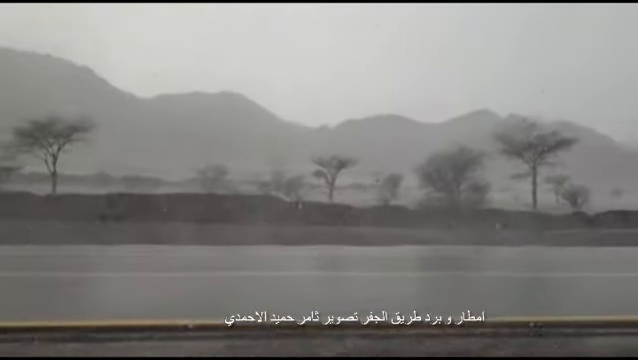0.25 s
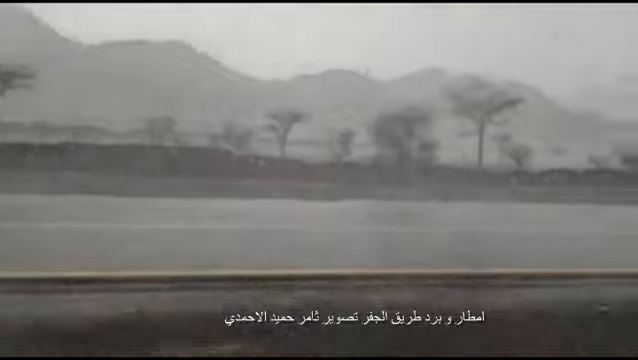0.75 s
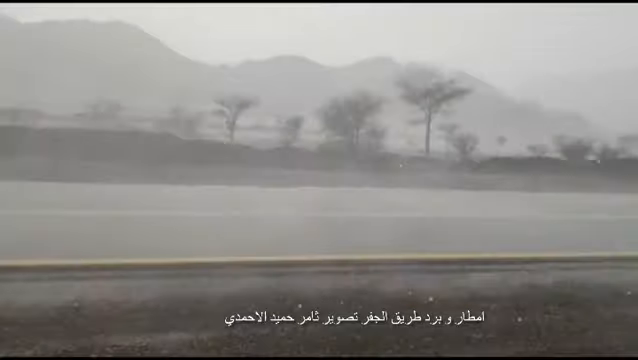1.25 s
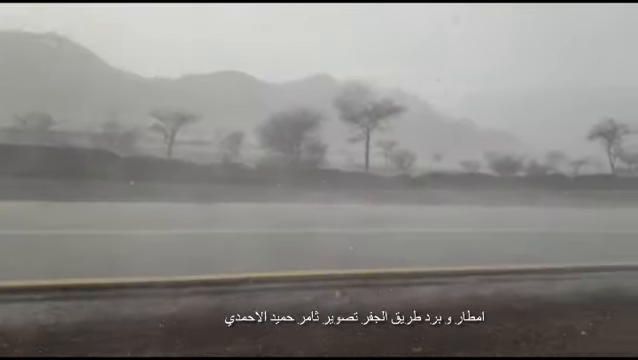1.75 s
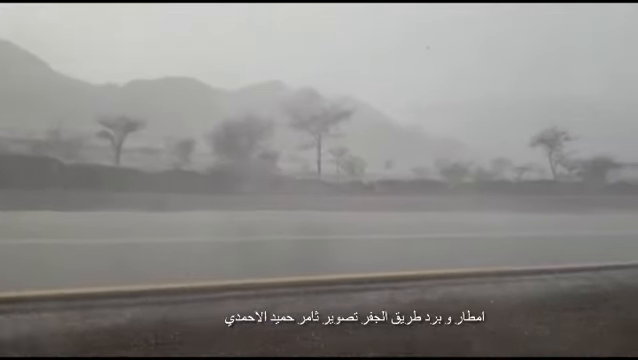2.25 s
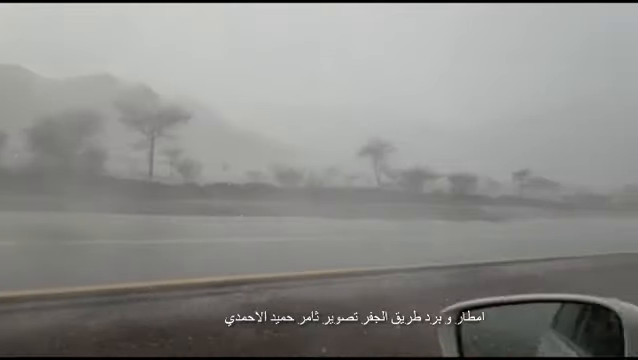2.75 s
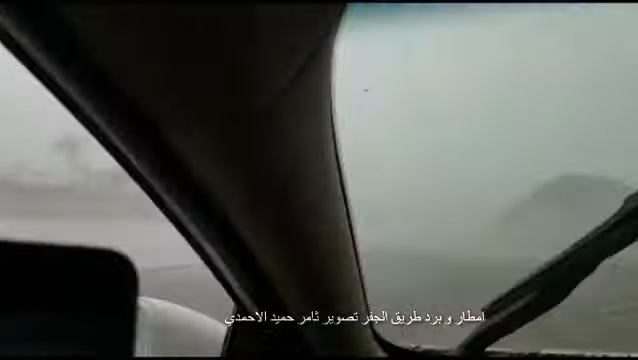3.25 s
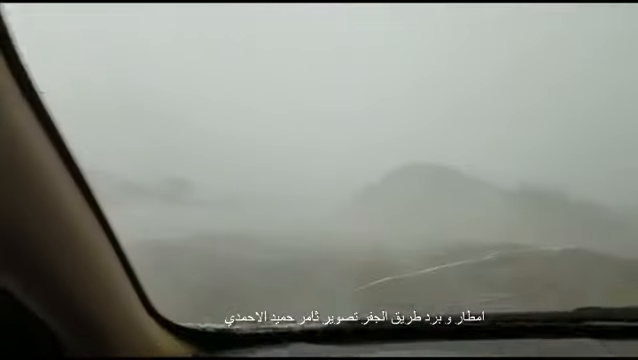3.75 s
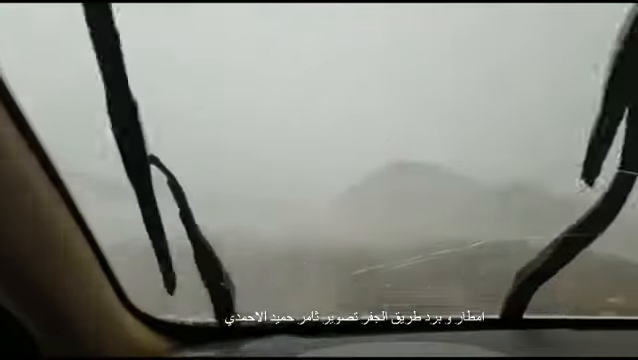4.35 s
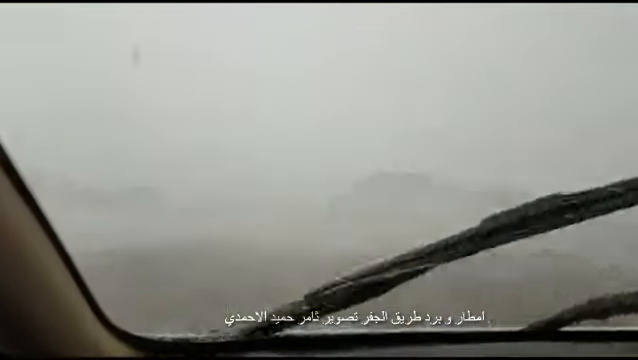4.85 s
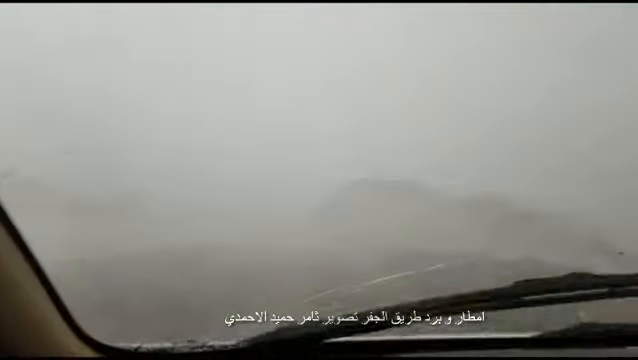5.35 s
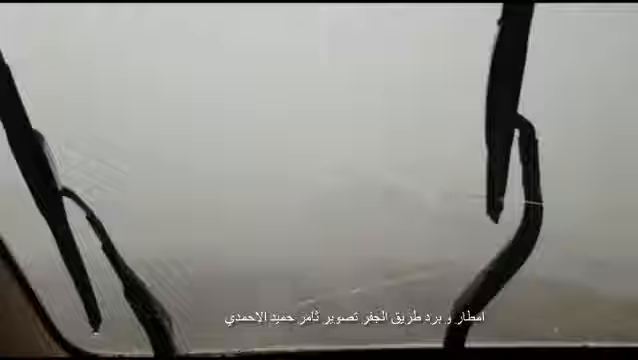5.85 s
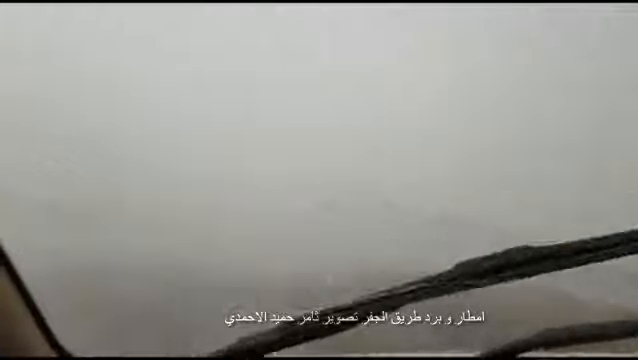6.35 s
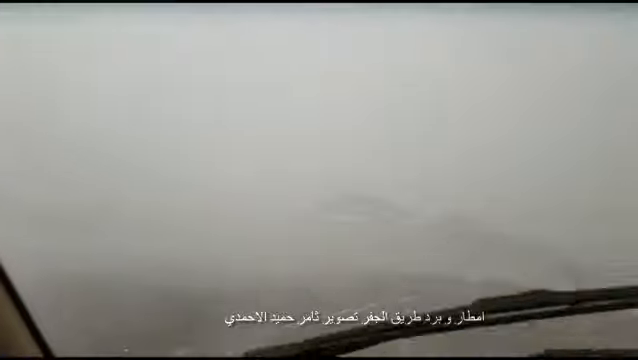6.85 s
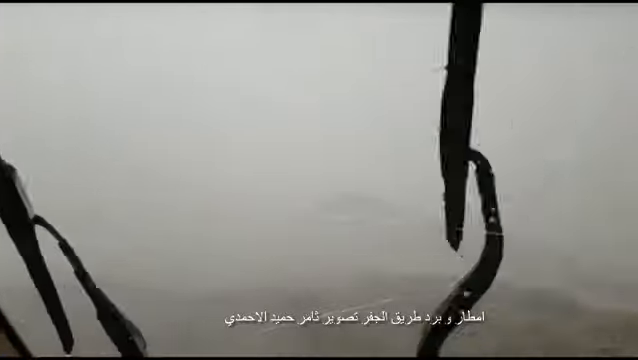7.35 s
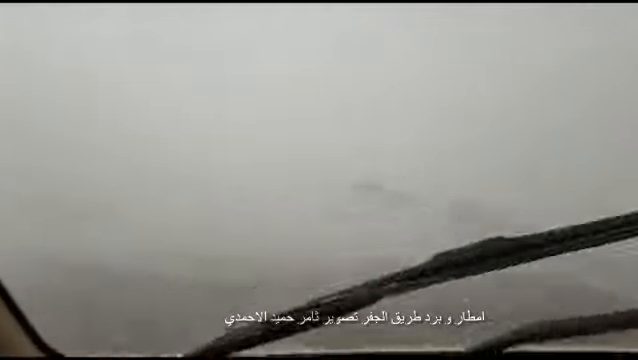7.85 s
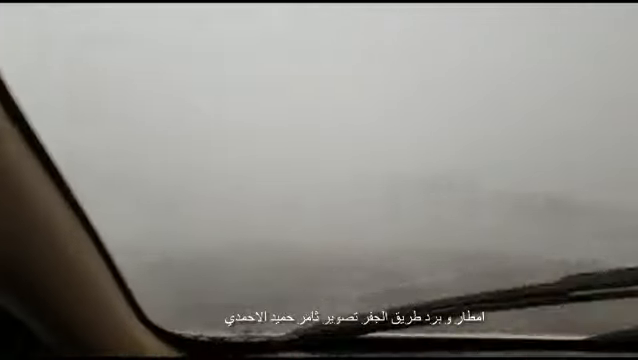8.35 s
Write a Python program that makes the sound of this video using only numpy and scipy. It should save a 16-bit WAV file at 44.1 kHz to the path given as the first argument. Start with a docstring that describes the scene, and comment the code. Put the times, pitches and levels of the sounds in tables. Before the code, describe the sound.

Hail hammers a car from inside the cabin: dense rattling ticks, hard cracks and dull roof knocks over a bright, surging rain hiss.

```python
"""Inside a car at the roadside, phone in hand: rain washes over a low rumble, and hail beats on roof and glass.
Near 1.8 s a push of wind swells the rumble; from 2.7 to 3.6 s the phone swings toward the windscreen.
Near 4.1 s a heavy stone lands, rebounds and booms in the roof; the downpour peaks about 6.1 s.
Rain and lesser hail are showers of noise bursts; the roof is noise through panel modes, with decaying sines.
Big stones crack throughout: each is a click and a noise burst that rattles round the cabin, then dies away."""
import sys
import numpy as np
from scipy import signal
from scipy.fft import rfft, irfft, next_fast_len
from scipy.io import wavfile
from scipy.ndimage import map_coordinates

SR = 44100
rng = np.random.default_rng(int(sys.argv[2]) if len(sys.argv) > 2 else 0)


def persist_wave(psi):
    """Save psi, clipped to +-1, as 16-bit WAV."""
    counts = np.round(np.clip(psi, -1, 1) * 32767).astype(np.int16)
    wavfile.write(sys.argv[1], SR, np.atleast_2d(counts).T)


N = 379701

# The weather's strength over time. Each row: time in seconds, dB over the usual downpour.
STORM = [(0.0, -5.5), (0.35, -6), (0.9, -1), (2.4, -1), (2.8, 1), (3.65, -2), (3.78, -4), (4.03, -3.5),
         (4.4, 1.5), (5.25, -2), (6.1, 3), (6.7, -1.5), (8.6, -2)]
# Gusts that throw sheets of rain and hail at the car.
# Each row: start in seconds, length in seconds, extra on the glass in dB, extra on the roof in dB.
GUSTS = [(0.674, 0.29, 0.5, 3), (1.02, 0.17, 1.5, -2.5), (1.466, 0.21, 2, 2.5), (1.93, 0.16, 4, 4.5),
         (2.246, 0.08, -2.5, 2.5), (2.763, 0.19, -1, 0.5), (3.395, 0.4, 2, 1), (3.764, 0.12, 2, -2),
         (4.106, 0.18, -2, 7.5), (4.304, 0.33, 4, 5.5), (4.982, 0.11, 3, -2.5), (5.374, 0.25, 1.5, 3),
         (5.82, 0.19, 2.5, 3), (6.16, 1.05, 0.5, 0.5), (6.712, 1.83, 1, 3.5), (7.386, 0.075, 5.5, 7.5),
         (7.806, 0.053, 3, 6.5)]
GUST_ATTACK_S, GUST_RELEASE_S = 0.02, 0.074
# Moments when the pelting of the glass lets up. Each row: centre in seconds, depth in dB.
LULLS = [(0.66, 3.5), (1.28, 2), (2.23, 2), (2.4, 4.5), (4.755, 2.5), (4.82, 2), (4.885, 1), (5.13, 3),
         (5.325, 3), (5.815, 4), (6.435, 1.5), (6.67, 3), (7.2, 2), (7.59, 2), (8.135, 5), (8.59, 1.5)]
LULL_S = 0.031  # from the centre to where the dip is 1/e as deep

# Levels in the usual downpour, ahead of the cabin and the microphone.
RUMBLE_DB, WASH_DB, SPATTER_DB, ROOF_DB, SMALL_HAIL_DB = -46.5, -29.5, -36, -33.5, -35
RUMBLE_GROWS, SPATTER_GROWS = 0.53, 1.4  # dB for each dB of storm
# One push of wind: its peak time, added level, and the times in which those dB rise and fall by a factor e.
BUFFET_S, BUFFET_DB, BUFFET_RISE_S, BUFFET_FALL_S = 1.77, 18, 0.16, 0.15

# Spectrum of the rumble in the car body. Each row: frequency in Hz, level in dB.
BOOM = [(15, -13), (45, -12), (80, -7.5), (130, -2.5), (300, -23)]
# Spectrum of the merged raindrops. Each row: frequency in Hz, level in dB.
WASH = [(100, -37), (500, -12), (900, -4), (1400, 7.5), (2600, 11), (3050, 12.5), (4500, 10.5), (6500, 5),
        (9000, 3), (16000, 6.5)]
# Spectrum of the fine spatter. Each row: frequency in Hz, level in dB.
SPATTER = [(2000, -9), (7000, 13.5), (12500, 13), (16000, -16)]

# Broad resonances of the roof panel. Each row: frequency in Hz, width in Hz, level in dB.
ROOF_MODES = [(125, 48, -18.5), (179.6, 39.4, -6), (241.7, 45, -6), (339.4, 67.6, 0.5), (521, 98, -6),
              (696, 258, -8)]
# Big stones on the roof. Each row: start in seconds, ring in dB, pitch of the struck spot in Hz, knock in dB.
ROOF_HITS = [(0.049, -28, 495, -24), (0.112, -28, 630, -22), (0.814, -23, 385, -25), (0.907, -31, 336, -24),
             (0.95, -29, 215, -28), (1.302, -17.5, 466, -21), (1.349, -14.5, 379, -17),
             (1.604, -28, 481, -18), (1.701, -24.5, 498, -20), (1.733, -18.5, 334, -19),
             (1.945, -31, 355, -19), (2.073, -30, 339, -18), (2.115, -25.5, 146, -26),
             (2.177, -32, 228, -20), (2.244, -28, 420, -16.5), (2.281, -32, 428, -17),
             (2.306, -21, 354, -15), (2.429, -29, 380, -26), (2.775, -29, 506, -28),
             (2.99, -27.5, 507, -15), (3.29, -21, 331, -13), (3.641, -21, 388, -27), (3.755, -31, 153, -34),
             (3.795, -25, 323, -36), (3.841, -30.5, 125, -32), (3.933, -23, 343, -26),
             (4.035, -18.5, 360, -12.5), (4.215, -21, 296, -21), (4.245, -15, 322, -16),
             (4.379, -14.5, 341, -10), (4.55, -27, 362, -10.5), (4.64, -19.5, 484, -18),
             (4.786, -22, 353, -19), (4.903, -22, 312, -24), (4.964, -27, 531, -13.5),
             (5.422, -20, 500, -10), (5.538, -21, 740, -26), (5.729, -27, 630, -26), (5.781, -16, 344, -24),
             (5.868, -18, 760, -18), (6.042, -23, 514, -11.5), (6.1, -18, 338, -17),
             (6.166, -17.5, 343, -28), (6.288, -37, 398, -15), (6.35, -22, 302, -20),
             (6.601, -25, 405, -12.5), (6.769, -13, 326, -11.5), (6.974, -20, 324, -17),
             (7.281, -24, 320, -14), (7.317, -25, 323, -18), (7.4, -17, 327, -27), (7.606, -22, 333, -19),
             (7.824, -27, 333, -15), (8.19, -20.5, 367, -16), (8.402, -29, 340, -27),
             (8.501, -20.5, 400, -15)]
# A blow heard through the roof lining. Each row: frequency in Hz, level in dB.
KNOCK = [(120, -38), (400, 3), (750, 3), (1100, -1.5), (3000, -14)]
SPOT_T60_S, KNOCK_T60_S = 0.11, 0.085  # 60 dB decay of the ring and of the knock
# The whole roof under one heavy blow. Each row: frequency in Hz, level in dB, 60 dB decay in seconds.
THUMP_MODES = [(85, -31, 0.09), (141, -20, 0.17), (180, -13, 0.2), (269, -18, 0.13), (348, -11, 0.13),
               (400, -12, 0.1), (510, -35, 0.057)]
# The heavy stone and its rebound. Each row: start in seconds, level in dB.
THUMP_BLOWS = [(4.1212, -3.5), (4.137, -7.5)]

# Big stones on the glass. Each row: start in seconds, level in dB, body in dB, ring of the pane near 3 kHz in dB,
# crispness in dB, length of the rattle's plateau in seconds.
GLASS_HITS = [(0.0015, -31, 7.5, 8, -8, 0.0085), (0.06, -24, 0, 12, -8, 0.001),
              (0.12, -27.5, 1, 10, -15, 0.0027), (0.146, -27.5, -5, 7, -16, 0.00092),
              (0.178, -26, -3, 2, -16, 0.004), (0.357, -23, 0, 5, 0, 0.004),
              (0.4108, -28.5, 0, 6, -15, 0.002), (0.5326, -30.5, 0, -3, -2, 0.0073),
              (0.9573, -28, 0, 1, -1, 0.0075), (1.049, -22.5, 1, 5.5, -2, 0.0074),
              (1.1038, -23.5, -3, -1, -2, 0.004), (1.1526, -15.5, -1, -10, 5.5, 0.006),
              (1.2127, -26, -2, 1, 3, 0.014), (1.499, -25, -1, -13, -6, 0.011),
              (1.6243, -25.5, -4, -1, 4, 0.022), (1.666, -19.5, -10, -6, 4, 0.0044),
              (1.867, -26, 2, 1, 3, 0.0043), (1.9176, -24, -5, 0, -2, 0.0071),
              (1.936, -23.5, 2, -3, -4, 0.008), (1.9476, -17, 1.5, -4, -4, 0.0037),
              (2.002, -21, -8, 4, -6, 0.002), (2.1187, -15.5, -1, -3, 0, 0.004),
              (2.1761, -20, 1, -6, 1, 0.0046), (2.2012, -17, -3.5, -3, -2.5, 0.0067),
              (2.2792, -26, 8.5, 2, -12, 0.009), (2.3117, -29, -1, -3, 0, 0.012),
              (2.654, -26, -4, -3, 3, 0.004), (2.7844, -28.5, 4, -2, 3, 0.0097),
              (2.8352, -22.5, 5, -9, 0, 0.0036), (2.9037, -21, -7, -3, 0, 0.004),
              (2.9799, -26.0, -6, 1, 1, 0.016), (3.0383, -24, -4, -11, 7, 0.012),
              (3.1182, -21.5, -17, -9, -4, 0.0056), (3.2601, -24.5, -15, -3, -3, 0.011),
              (3.298, -19.5, -11, -7, -12, 0.0045), (3.3366, -17.5, 0, 4, -13, 0.0044),
              (3.3755, -21.5, -8, 1, 2, 0.0038), (3.417, -24, -12, -4, -5, 0.0083),
              (3.4904, -27.5, -8, -4, 1, 0.006), (3.563, -24.5, -6, -3, 6, 0.012),
              (3.6382, -24, 1, -2, -1, 0.01), (3.731, -21.5, -11, -6, -1, 0.011),
              (3.8313, -28.5, -12, -3, 7, 0.016), (4.071, -17, -4, 0.5, 2, 0.007),
              (4.1231, -24, 7, -2, -7, 0.012), (4.1975, -12, -4, -7, 1, 0.0049),
              (4.2645, -18.5, -6, -2, -4, 0.0055), (4.3162, -18.5, -5, -4, -11, 0.004),
              (4.3467, -16, -6, 3.5, 0, 0.011), (4.5677, -14.5, -17, -7, -2, 0.0086),
              (4.641, -19, -1, -7, -2, 0.012), (4.6939, -25.5, 8.5, -2, -6, 0.0093),
              (4.7868, -22, -4, 1, 0, 0.0049), (4.834, -21, -6, 1, -1, 0.004),
              (4.9018, -22.5, -0.5, -2, 5, 0.0076), (5.0041, -26, 1, -4, 5, 0.0045),
              (5.0233, -19.5, 1, 1, 4, 0.006), (5.052, -31, 2, 1, 13, 0.0069),
              (5.1493, -28, 1, -4, 5, 0.006), (5.2017, -23.5, -9, -3, -3, 0.012),
              (5.2201, -29.5, 0, 6, -1, 0.006), (5.346, -23, 5.5, -1, 5, 0.0082),
              (5.392, -23, -4, 2, 3, 0.012), (5.4822, -14, -11, -11, -5, 0.0064),
              (5.543, -32, 7, -7, 1, 0.011), (5.6622, -20, 0, -5, -3, 0.0044),
              (5.6793, -15.5, -8, -2, -4, 0.0055), (5.7176, -20, -1.5, 0, 3, 0.006),
              (5.726, -16, -1, -3, 6, 0.0058), (5.7844, -25.0, 1, 1, 10, 0.004),
              (5.8801, -21, -2, -4, -1, 0.012), (5.9488, -23.5, -2, -5, 9, 0.014),
              (6.036, -21, -8, -4, 9, 0.0083), (6.0782, -21.0, -4, 0, 2, 0.0076),
              (6.1245, -22, -4, -4, 3, 0.011), (6.1976, -15.5, -12, -10, -5, 0.0043),
              (6.2474, -28, 2, -4, -8, 0.001), (6.2992, -25.5, -9, -4, -3, 0.014),
              (6.387, -17.5, -3, -4, 3, 0.0086), (6.4834, -23.5, 1, 0, 1, 0.014),
              (6.5371, -21, 1, -7, 2, 0.008), (6.599, -25, -1, -11, 4, 0.0074),
              (6.6978, -27, -8, -11, -1, 0.0049), (6.7516, -24, 4, -6, -15, 0.0026),
              (6.7803, -33, 8, 7, 5, 0.0053), (6.923, -22.5, 0, -3, 4, 0.01),
              (6.9998, -20.5, 0, -5, -1, 0.01), (7.03, -21.5, -6, -10, 8.5, 0.002),
              (7.0684, -31.5, 9, -5, 2, 0.016), (7.1463, -23, -3, -2, -10, 0.0098),
              (7.2376, -14, -2, 4.5, -3, 0.0048), (7.3338, -28, -1, -1, -1, 0.0055),
              (7.4501, -25, 0, 4, -4, 0.016), (7.5108, -26, 1, 8, -13, 0.0031),
              (7.62, -24, 4, -8, 9, 0.0051), (7.7405, -30, 0, 7, -3, 0.0067),
              (7.841, -30, 0, -2, 12, 0.0033), (7.8724, -14.5, -17, 2, -10, 0.002),
              (8.008, -24, 1, -8, 10, 0.004), (8.0712, -18, 0, -2, -5, 0.0034),
              (8.0964, -25.5, -5, -2, 6, 0.012), (8.1599, -23.0, -2, -12, -6, 0.0078),
              (8.2192, -25.5, 6, 11, 2, 0.0046), (8.4024, -24, -0.5, -1, 5, 0.013),
              (8.45, -28, -5, -11, -12, 0.004), (8.5538, -15.5, -5, -6, -2, 0.0054)]
# Common spectrum of stones on glass. Each row: frequency in Hz, level in dB.
GLASS = [(100, -17), (400, 0.5), (900, 1.5), (1500, 1.5), (2750, 4.5), (3030, 10), (3300, 6.5), (4500, 4),
         (6500, -0.5), (12500, -2.5), (16000, -4.5)]
SPOT_DB = 3.5  # random spread of the colour from spot to spot of the glass
GLASS_T60_S, T60_PER_HOLD = 0.021, 4  # decay of a bare tick; seconds added per second of plateau
SMALL_HOLD_S = 0.004  # longest plateau of a lesser stone
SNAP = 4  # height of the direct click against noise of unit level

STANDING_DB = 1.2  # random spread of the cabin's standing waves
# The cabin at the side window against that at the windscreen. Each row: frequency in Hz, difference in dB.
SIDE_WINDOW = [(60, -1), (120, -4), (220, 4), (335, -3), (490, 4.5), (680, 0), (1100, 4.5), (1750, 3.5),
               (2400, -1), (3000, -4.5), (4000, 1.5), (6000, 1.5), (8200, -8), (11000, -0.5)]
# The phone's turn. Each row: time in seconds, facing from 0 (side window) to 1 (windscreen).
FACING = [(2.7, 0.17), (3.6, 0.81)]
# Left-right likeness at the ports. Each row: frequency in Hz, correlation from 0 to 1.
ALIKE = [(40, 0.55), (150, 0.88), (330, 0.88), (550, 0.66), (850, 0.62), (1200, 0.4), (1700, 0.29),
         (3000, 0.02)]
# Long waves bend round the phone. Each row: frequency in Hz, lag of the left port in seconds.
PORT_LAG = [(250, 0.00018), (600, 0.00027), (1200, 0.000323)]
# Colour of the microphone ports. Each row: frequency in Hz, level in dB.
PORTS = [(6300, 3), (7100, 1), (8000, -11.5), (9000, -6), (10500, -3.5), (12500, 0.5)]
# Imbalance of the ports. Each row: frequency in Hz, left minus right in dB.
LEAN = [(30, 0), (100, 0), (260, -0.9), (4500, -1.15), (9000, .4)]
CEILING = 0.85  # peaks are rounded off below this sample value
TOP_HZ = 15880  # upper band limit


def amp(db):
    """Amplitude factor of a level in dB."""
    return 10 ** (np.asarray(db) / 20)


def unit(x):
    """x scaled to an RMS of one."""
    return x / np.sqrt(np.mean(x ** 2) + 1e-20)


def along(points, hz):
    """Values between (Hz, value) points on a log frequency axis."""
    f, v = np.transpose(points)
    return np.interp(np.log(hz + 1), np.log(f), v)


def curves(rows):
    """One value per sample for each column after the time."""
    s, *cols = np.transpose(rows)
    return [np.interp(np.arange(N) / SR, s, c) for c in cols]


def filtered(x, response):
    """x through a response given as a function of frequency."""
    m = next_fast_len(N + SR // 4)
    spectrum = rfft(x, m) * response(np.fft.rfftfreq(m, 1 / SR))
    return irfft(spectrum, m)[..., :N]


def coloured(x, spectrum):
    """x through a (Hz, dB) spectrum."""
    return filtered(x, lambda hz: amp(along(spectrum, hz)))


def placed(times, sounds):
    """Sum short two-channel sounds at their times."""
    out = np.zeros((2, N + SR))
    for s, sound in zip(times, sounds):
        out[:, max(round(s * SR), 0):][:, :sound.shape[-1]] += sound
    return out[:, :N]


def wobble(rate):
    """A smooth random curve, rate knots a second."""
    knots = rng.standard_normal(int(N * rate / SR) + 4)
    return map_coordinates(knots, [np.arange(N) * rate / SR])


def patter(count, spread_db, t60):
    """A shower of small impacts of random size, each a noise burst that falls 60 dB in t60."""
    when, size = rng.random((count, 2)).T
    energy = np.bincount((when * N).astype(int), amp(spread_db * size ** 3) ** 2, N)
    energy = signal.lfilter([1], [1, -amp(-60 / (t60 * SR)) ** 2], energy)
    return unit(np.sqrt(energy) * rng.standard_normal((2, N)))


def gusts():
    """Extra dB on the glass and on the roof: each gust swells, holds and lets go."""
    start, length, glass_db, roof_db = np.transpose(GUSTS)[:, :, None]
    t = np.arange(N) / SR - start
    attack = t / GUST_ATTACK_S
    release = 1 - (t - length) / GUST_RELEASE_S
    swell = np.clip(np.minimum(attack, release), 0, 1)
    return (glass_db * swell).max(axis=0), (roof_db * swell).max(axis=0)


def lulls():
    """dB by which the pelting of the glass drops in its short gaps."""
    s, depth_db = np.transpose(LULLS)[:, :, None]
    t = np.arange(N) / SR - s
    return (depth_db * np.exp(-(t / LULL_S) ** 2)).sum(axis=0)


def rumble(storm_db):
    """The storm shakes the car body softly, as low noise; one push of wind rocks it harder."""
    t = np.arange(N) / SR - BUFFET_S
    push_db = BUFFET_DB * np.exp(-np.abs(t) / np.where(t < 0, BUFFET_RISE_S, BUFFET_FALL_S))
    level_db = RUMBLE_DB + RUMBLE_GROWS * storm_db + push_db + 1.6 * wobble(11)
    return amp(level_db) * unit(coloured(rng.standard_normal((2, N)), BOOM))


def rain(storm_db):
    """Countless drops merge into a wash; fine spatter comes on top in flurries."""
    drops = patter(count=6000, spread_db=10, t60=.033)
    ticks = patter(count=1500, spread_db=13, t60=.033) * amp(1.8 * wobble(16))
    wash = amp(WASH_DB + storm_db) * unit(coloured(drops, WASH))
    spatter = amp(SPATTER_DB + SPATTER_GROWS * storm_db) * unit(coloured(ticks, SPATTER))
    return wash + spatter


def roof_response(hz):
    """The roof panel as a sum of broad resonances of alternating sign."""
    total = 0
    for k, (centre, width, db) in enumerate(ROOF_MODES):
        damping = 1j * hz * width
        total = total + (-1) ** k * amp(db) * damping / (centre * centre - hz * hz + damping)
    return total


def roof(storm_db):
    """The roof drums all the time; a big stone knocks and rings the spot that it strikes."""
    blows = patter(count=3500, spread_db=7, t60=.05)
    drum = unit(filtered(blows, roof_response))
    s, ring_db, pitch_hz, knock_db = np.transpose(ROOF_HITS)[:, :, None, None]
    t = np.arange(SR // 5) / SR
    ring = np.sin(2 * np.pi * pitch_hz * t) * amp(-60 * t / SPOT_T60_S) * (1 - np.exp(-t / .003))
    # the ring lies in the part that both ports share
    spots = placed(s.ravel(), amp(ring_db) * ring * [[1], [0]])
    knock_noise = rng.standard_normal((len(s), 2, len(t)))
    knocks = placed(s.ravel(), amp(knock_db - 60 * t / KNOCK_T60_S) * knock_noise)
    return amp(ROOF_DB + storm_db) * drum + spots + coloured(knocks, KNOCK)


def cracks(body_db, ring_db, crisp_db, hold_s, rise_s, tick, grit_db, size=3072):
    """One burst per stone: a snap and bright contact tick, a short plateau of cabin echoes, then a fast decay."""
    t, hz = np.arange(size) / SR, np.fft.rfftfreq(size, 1 / SR)
    t60 = GLASS_T60_S + T60_PER_HOLD * np.abs(hold_s)
    count = len(t60)
    decay_db = -60 * np.maximum(t - hold_s[:, None], 0) / t60[:, None]
    shape = (1 - np.exp(-t / rise_s)) * amp(decay_db)

    # splinters of ice make each burst gritty
    coarse = rng.standard_normal((count, 2, size // 24))
    grit = amp(grit_db * signal.resample(coarse, size, axis=2))
    noise = rng.standard_normal((count, 2, size)) * unit(grit)

    # differenced noise is bright
    contact = tick * np.diff(rng.standard_normal(noise.shape), prepend=0) * np.exp(-t / .0015)
    contact[..., size // 96] += SNAP * rng.choice([-1, 1], (count, 2))

    # every spot of the glass has its own colour
    knots = np.geomspace(300, 16000, num=64)
    ripple = np.array([np.interp(hz, knots, row) for row in rng.standard_normal((count, len(knots)))])
    body = body_db[:, None] * along([(300, 0), (700, 1), (1800, 1), (3000, 0)], hz)
    pane = ring_db[:, None] * along([(2400, 0), (2850, 1), (3200, 1), (3700, 0)], hz)
    crisp = crisp_db[:, None] * along([(6000, 0), (11000, 1)], hz)
    colour = amp(SPOT_DB * ripple + body + pane + crisp + along(GLASS, hz))
    response = signal.resample(colour, size + 1, axis=1)[:, None]
    burst = noise * shape[:, None] + contact
    return irfft(rfft(burst, 2 * size) * response)[..., :size]


def small_hail(storm_db, count=950):
    """Lesser stones tick and rattle more softly on the glass, harder when the downpour swells."""
    nudge, size, body, ring, crisp, length = rng.random((count, 6)).T
    # evenly spread, then each shifted by up to three places
    when = (np.arange(count) + 6 * (nudge - .5)).clip(0) * N / count / SR
    bursts = cracks(14 * (body - .5), 10 * (ring - .6), 18 * (crisp - .6), SMALL_HOLD_S * length,
                    rise_s=0.0006, tick=0.2, grit_db=1.0, size=768)
    sizes = amp(6.5 * size ** 3)
    return amp(SMALL_HAIL_DB + storm_db) * unit(placed(when, bursts * sizes[:, None, None]))


def thump():
    """One heavy stone lands, rebounds and sets the whole roof booming in decaying sines."""
    t = np.arange(SR // 4) / SR
    attack = (1 - np.exp(-t / .002)) ** 2

    def boom():
        """The roof's modes, each from a random phase."""
        return sum(amp(db - 60 * t / t60) * np.sin(2 * np.pi * (hz * t + rng.random()))
                   for hz, db, t60 in THUMP_MODES)

    s, blow_db = np.transpose(THUMP_BLOWS)
    return placed(s, [amp(db) * boom() * attack * np.array([[1], [0]]) for db in blow_db])


def big_hail():
    """Single hard stones crack close by on the glass: some only tick, some rattle on."""
    s, db, body_db, ring_db, crisp_db, hold_s = np.transpose(GLASS_HITS)
    bursts = cracks(body_db, ring_db, crisp_db, hold_s, rise_s=0.0001, tick=0.76, grit_db=1.5)
    return placed(s, bursts * amp(db)[:, None, None])


def standing_waves(x):
    """The closed cabin favours some frequencies, from 400 Hz up, differently in each of the two parts."""
    knots = np.arange(0, SR / 2, 45)
    peaks = rng.standard_normal((2, len(knots)))
    depth = STANDING_DB * along([(400, 0), (700, 1)], knots)
    return filtered(x, lambda hz: amp(np.array([np.interp(hz, knots, depth * row) for row in peaks])))


def turning(x):
    """The cabin's colour changes as the phone swings from the side window toward the windscreen."""
    facing = np.clip(curves(FACING)[0], 0, 1)
    return facing * x + (1 - facing) * coloured(x, SIDE_WINDOW)


def at_ports(pair):
    """Two parts become left and right: long waves arrive alike, the right port a little sooner."""
    def blend(hz):
        """Shares of the common and the opposed part that give the wanted likeness."""
        turn = np.arccos(np.clip(along(ALIKE, hz), -1, 1)) / 2
        return np.array([np.cos(turn), np.sin(turn)])

    def lag(hz):
        """Half the lag on the left port, half as a lead on the right."""
        return np.exp(np.pi * 1j * hz * along(PORT_LAG, hz) * np.array([[-1], [1]]))

    mid, side = filtered(pair, blend)
    return filtered(np.array([mid + side, mid - side]), lag)


def scene():
    """Storm and gusts set how hard glass and roof are pelted; the big stones land on top."""
    storm_db, = curves(STORM)
    glass_db, roof_db = storm_db + np.array(gusts())
    glass_db = glass_db - lulls()
    drumming = roof(roof_db + 0.6 * wobble(8.7))
    patter_bed = standing_waves(rain(glass_db) + drumming + small_hail(glass_db))
    return at_ports(turning(rumble(roof_db) + patter_bed + thump() + big_hail()))


def record(dry):
    """The phone's ports differ a little and notch the treble; peaks are rounded off, then the band is cut."""
    halves = np.array([[.5], [-.5]])
    ports = filtered(dry, lambda hz: amp(along(PORTS, hz) + along(LEAN, hz) * halves))
    rounded = ports / (1 + np.abs(ports / CEILING) ** 6) ** (1 / 6)
    return filtered(rounded, lambda hz: hz < TOP_HZ)


dry = scene()
out = record(dry)
persist_wave(out)
```